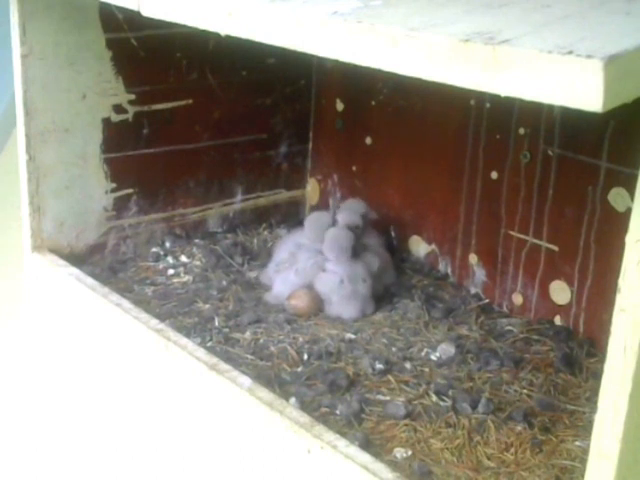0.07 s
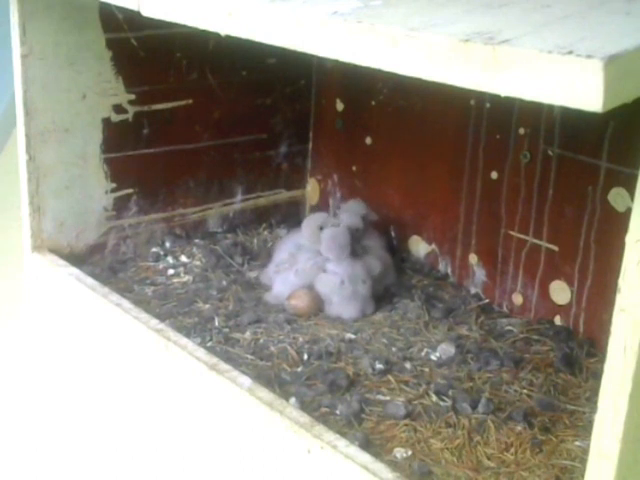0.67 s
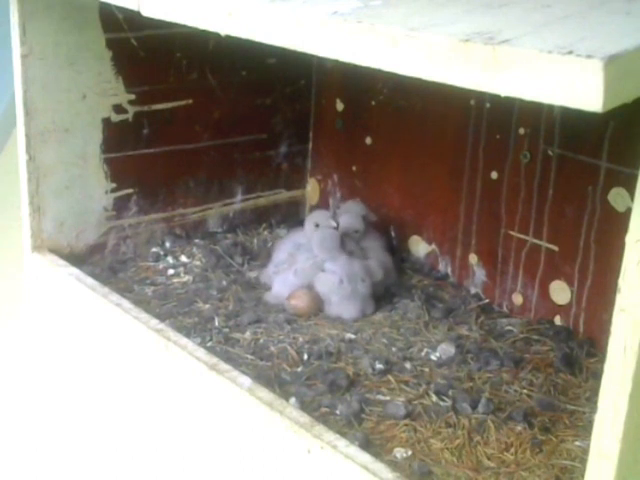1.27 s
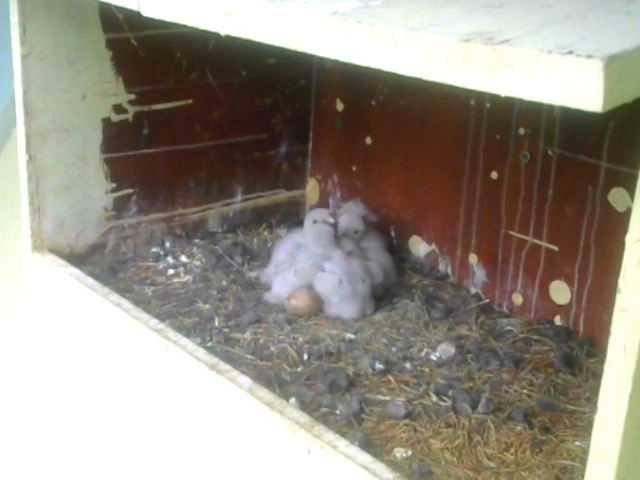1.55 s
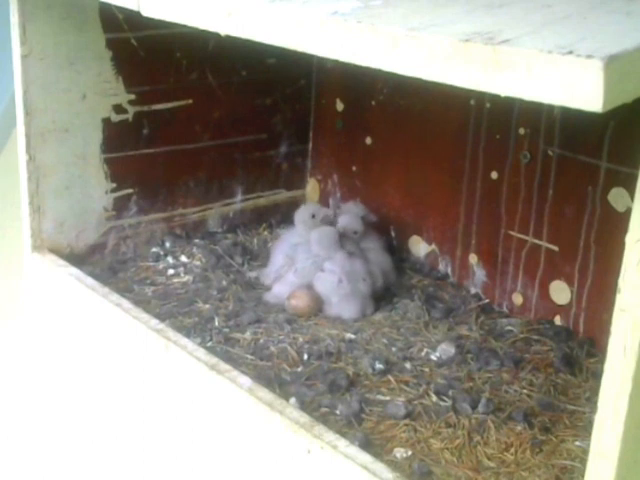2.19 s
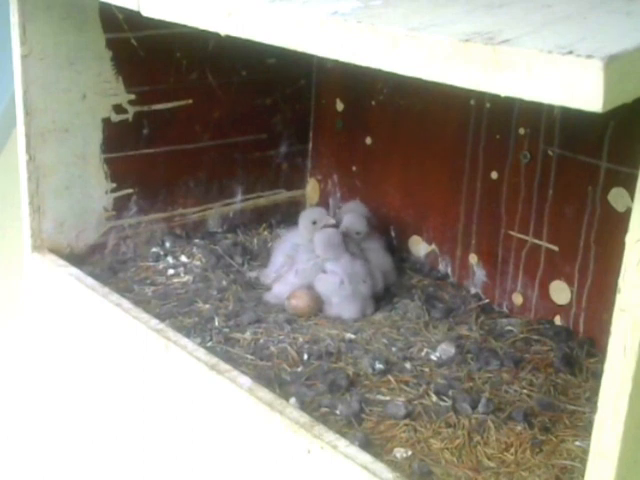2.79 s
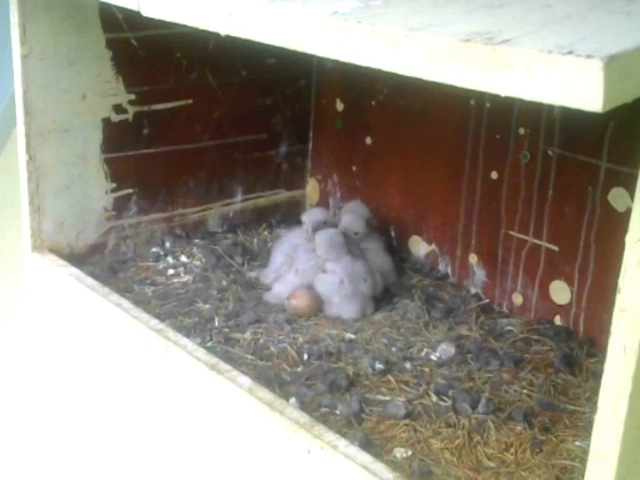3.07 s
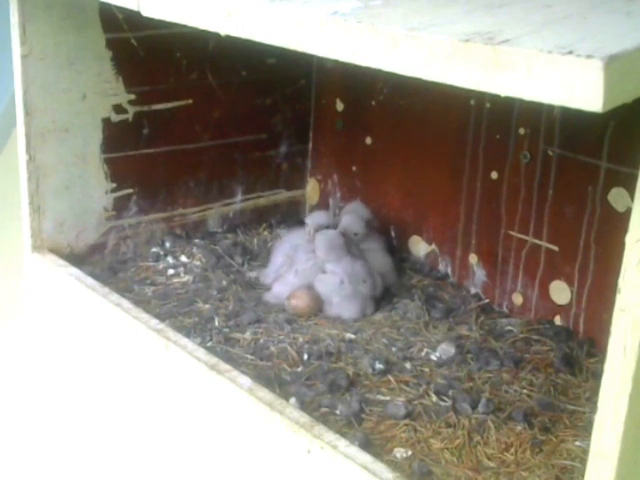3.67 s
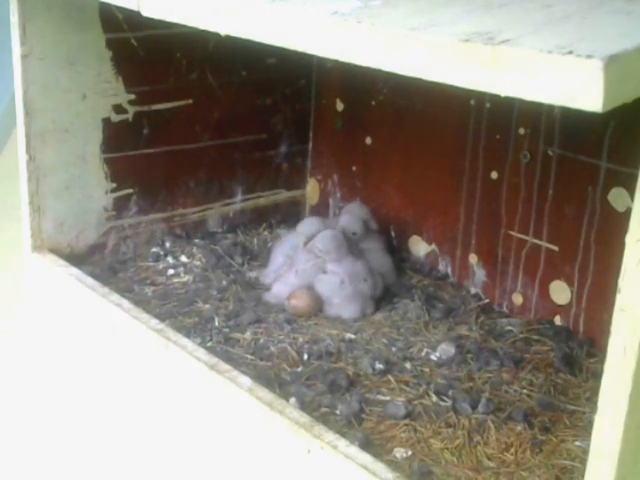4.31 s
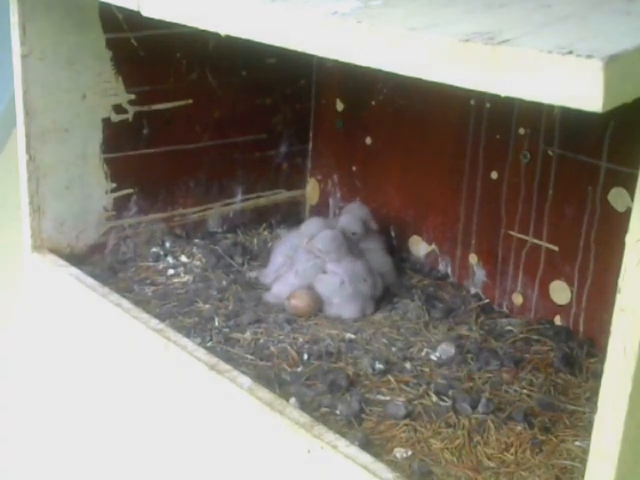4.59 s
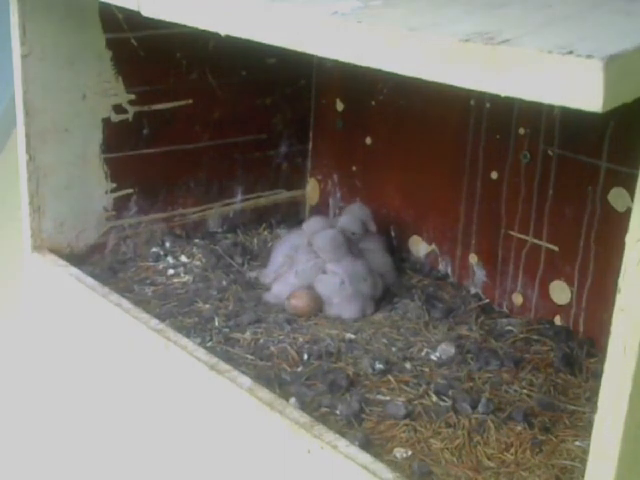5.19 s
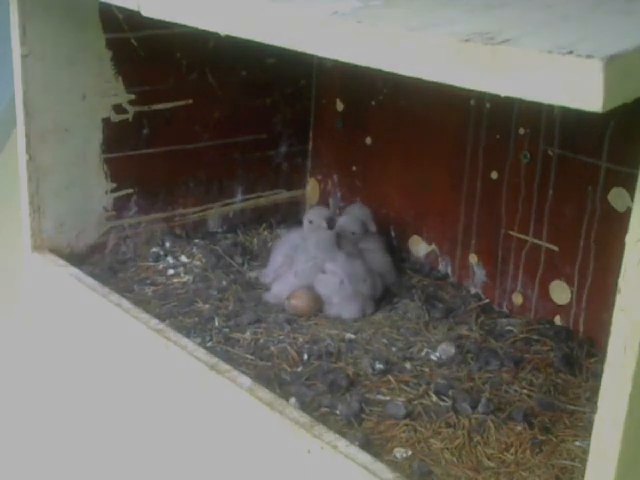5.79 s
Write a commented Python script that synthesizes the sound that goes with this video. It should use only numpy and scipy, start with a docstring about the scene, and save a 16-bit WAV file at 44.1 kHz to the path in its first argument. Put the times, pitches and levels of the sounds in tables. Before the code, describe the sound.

Nestlings in an open wooden box beg with thin, wavering two-note whistles, about two a second, and one call breaks into a brief squeal. Small birds outside add bursts of harsh, falling chirps with a slight echo, and others twitter faintly far away. The begging pauses midway, then resumes with a rustle of nest litter. Soft bumps and a steady microphone hiss lie underneath.

```python
"""Downy nestlings beg in an open wooden nest box with thin, wavering two-note whistles. From the start,
small birds outside answer with harsh falling chirps that echo, others twitter far away, and the chicks
shuffle now and then over a steady microphone hiss. Near 1.8 s one call breaks into a squeal. After 3.4 s
the begging pauses and a burst of chirps stands alone; at 4.5 s the litter rustles and the begging resumes.
A faint high peep comes near 4.8 s, then a last run of chirps as the hiss sinks a little."""
import sys
import numpy as np
from scipy import signal
from scipy.fft import rfft, irfft
from scipy.io import wavfile
from scipy.ndimage import uniform_filter1d

SR = 44100
rng = np.random.default_rng(int(sys.argv[2]) if len(sys.argv) > 2 else 0)


def transcribe(signal):
    """Save signal, clipped to [-1, 1], as a 16-bit WAV file at the path in sys.argv[1]."""
    frames = np.atleast_2d(signal).T
    limited = np.clip(frames, -1, 1)
    pcm = np.round(limited * 32767).astype(np.int16)
    wavfile.write(sys.argv[1], SR, pcm)


N = 257984
TIME = np.arange(N) / SR

# begging calls, two arches of pitch each: (start [s], first arch [s], second rise [s], final fall [s],
# opening pitch [Hz], first crest [Hz], dip [Hz], second crest [Hz],
# fundamental base level [dB], octave base level [dB], gain of second arch [dB])
BEGGING_CALLS = [(-0.039, 0.085, 0.024, 0.04, 3000, 3154, 3173, 3300, -36.5, -46.5, -2.5),
                 (0.454, 0.069, 0.05, 0.073, 3053.0, 3232, 3248, 3494, -38, -34, 0),
                 (0.968, 0.1, 0.061, 0.065, 3195, 3338, 3200, 3804, -37.5, -35.5, 0.0),
                 (1.557, 0.12, 0.066, 0.019, 3500, 3445, 3319.0, 3445, -37, -35, -3),
                 (2.139, 0.035, 0.013, 0.052, 3170, 3260, 3170, 3336, -48.5, -42.5, 5.5),
                 (2.589, 0.084, 0.082, 0.036, 3300, 3250, 3055.0, 3357, -41.5, -37, -1.0),
                 (3.142, 0.13, 0.044, 0.038, 3200, 3550, 3160, 3450, -46.0, -37.5, 3),
                 (4.556, 0.082, 0.056, 0.081, 3100, 3440, 3207, 3470, -46.5, -39, -1.5),
                 (5.197, 0.081, 0.021, 0.04, 3404, 3300, 3155.0, 3287, -46.5, -39.5, 0.5),
                 (5.712, 0.11, 0.013, 0.065, 3160, 3474, 3300, 3550, -51.5, -40.5, -5)]
# response of chick and box to the fundamental, and to the octave: (frequency [Hz], gain [dB])
FUNDAMENTAL_RESPONSE = [(2950, 0), (3230, 1), (3430, -1), (3530, -5.5), (3680, -1), (3860, -11)]
OCTAVE_RESPONSE = [(6000, -21), (6260, -6.5), (6460, 0.5), (6860, -2.5), (7080, -2), (7360, -6),
                   (7720, -31)]
# course of the squeal: (time [s], pitch [Hz], fundamental level [dB], octave level [dB])
SQUEAL_CONTOUR = [(1.744, 3610, -45, -66), (1.755, 4470, -32.5, -60), (1.764, 4895, -18, -73),
                  (1.773, 5230, -31, -76), (1.784, 4820, -20.5, -68), (1.794, 4000, -30, -33.5),
                  (1.805, 3450, -37, -37), (1.819, 3000, -38, -65)]
# chirps outside, one glide a row; the row at 3.823 s is an echo of the falling sweep just before it: # (start
# [s], duration [s], time to peak [s], first pitch [Hz], last pitch [Hz], relative level [dB], # rasp deviation
# [Hz])
CHIRP_SYLLABLES = [(0.018, 0.026, 0.0083, 5510, 6320, -31, 110),
                   (.034, 0.048, 0.034, 4560, 5190, -27.5, 190),
                   (0.068, .024, 0.0046, 3805, 2735, -29, 180), (0.107, .022, 0.016, 2810, 3570, -35.5, 40),
                   (0.124, .014, 0.0051, 3770, 4160, -26, 30), (0.843, 0.023, 0.022, 4410, 4080, -28, 120),
                   (0.853, 0.029, .008, 5120, 4490, -32, 200), (0.866, 0.039, 0.01, 3990, 2934, -18, 150),
                   (0.897, 0.057, .02, 2800, 3630, -35, 280), (0.937, 0.087, .024, 2260, 2560, -31, 170),
                   (3.799, 0.032, 0.031, 5280, 4150, -22, 140), (3.823, 0.048, 0.043, 5130, 3440, -24, 190),
                   (3.831, .04, .01, 3950, 2900, -18.5, 120), (3.869, .13, 0.025, 3686, 4256, -35.5, 260),
                   (3.91, 0.049, 0.015, 2504, 2474, -32.5, 150),
                   (5.06, 0.058, 0.025, 2830, 3090, -32.5, 90), (5.098, .04, 0.018, 2975, 2306, -35, 100),
                   (5.147, 0.14, 0.024, 2953, 2870, -37.5, 120), (5.226, 0.03, 0.027, 3824, 3670, -24, 60),
                   (5.468, 0.026, 0.026, 2446, 3020, -35, 70),
                   (5.491, 0.099, 0.0043, 3120, 3150, -32.5, 70.5),
                   (5.57, 0.065, .017, 5100, 4160, -30, 210), (5.573, 0.062, 0.04, 4305, 2810, -25, 190),
                   (5.631, 0.047, 0.013, 3100, 4330, -32.5, 200),
                   (5.662, 0.072, 0.025, 2873, 2240, -35, 150), (5.712, 0.13, 0.021, 2295, 1548, -37, 142)]
# far twitter: (start [s], duration [s], pitch [Hz], glide [Hz], level [dB], half-bandwidth [Hz])
FAR_NOTES = [(-.02, .06, 1566, 0, -50, 130), (0.088, 0.086, 1470, 3, -49.5, 45),
             (0.137, .42, 1670, -350, -57, 260), (0.833, 0.12, 1453, 0, -54, 70),
             (.98, 0.271, 1652, -100, -53.5, 300), (1.679, 0.18, 1823, 60, -52, 270),
             (1.858, 0.2, 1560, -100, -58, 70.4), (2.43, 0.15, 2316, -200, -58.5, 150),
             (2.886, 0.056, 2430, 0, -54, 140), (2.967, 0.085, 2420, 250, -48, 110),
             (3.048, 0.75, 2465, -100, -61.5, 150), (3.299, .2, 2054, 43, -53, 119)]
# chicks bumping the floor: (start [s], duration [s], frequency [Hz], level [dB])
FLOOR_BUMPS = [(.0, 0.18, 161.4, -54.5), (.975, 0.037, 149, -50), (1.055, 0.045, 541, -51.5),
               (1.2, 0.078, 291, -56), (1.382, 0.059, 290, -47), (1.759, 0.093, 169.5, -52),
               (1.875, 0.037, 174, -46.5), (2.392, 0.04, 194, -48.5), (3.675, 0.031, 403, -51.5),
               (3.84, 0.16, 260.6, -59), (4.049, 0.026, 265, -49), (4.899, 0.12, 254.6, -54.5)]
# rustles of the litter, and one faint high peep near 4.8 s:
# (start [s], duration [s], centre frequency [Hz], level [dB])
RUSTLES_AND_PEEP = [(0.607, 0.23, 7860, -57.5), (2.034, 0.2, 4020, -53), (3.044, 0.13, 4370, -53.5),
                    (4.507, 0.057, 7160, -46), (4.54, 0.11, 6260, -37.5), (4.814, 0.052, 6500, -50)]
# spectrum of the hiss: (frequency [Hz], relative spectral density [dB])
HISS_SPECTRUM = [(15, -65), (25, -22.5), (267, -2.5), (359, -11), (684, -2.5), (804, -8.5), (945, -7),
                 (1140, -13), (1410, -8.5), (1800, -13), (2490, -11), (3340, -12.5), (6730, -8),
                 (9550, -28), (15500, -33)]
# slow sinking of the background: (time [s], gain [dB])
BACKGROUND_GAIN = [(0, 1.53), (4.3, 0.5), (5.85, -2.5)]


def nestlings():
    """Turbulent flow through the beak adds hiss to each whistle; the box walls add early reflections."""
    calls = [whistle(*begging_contour(row), jitter=.006, shimmer_db=1.6, skirt_db=-7.5)
             for row in BEGGING_CALLS]
    tone, flow, gape = np.sum(calls, axis=0)
    # the air hisses higher as the beak opens
    dull_air = from_db(-19) * (1 - .5 * gape) * band_noise(5540, 6030)
    bright_air = from_db(-15) * gape * band_noise(7200, 8130)
    box = from_db(-14) * echoes(tone, delay_s=.002, t60=.05, count=60)
    return tone + flow * (dull_air + bright_air) + box


def begging_contour(row):
    """Source and filter: the pitch crests twice and sags, and chick and box weight each partial."""
    start, arch_s, rise_s, fall_s, *pitches, fundamental_db, octave_db, second_arch_db = row
    attack_s, release_s, sag_hz_per_s = .037, .033, 9500
    crest_s = arch_s + rise_s
    length = crest_s + fall_s
    at, t, gate = span(start, length)
    turns = np.arange(len(pitches))
    step = np.interp(t, [0, .6 * arch_s, arch_s, crest_s], turns)
    eased = np.floor(step) + np.sin(np.pi / 2 * (step % 1)) ** 2
    sag_hz = sag_hz_per_s * np.maximum(t - crest_s, 0) ** 2 / fall_s
    waver = wobble(28, len(at))   # unsteady effort moves pitch and level together
    hz = (np.interp(eased, turns, pitches) - sag_hz) * (1 + .005 * waver)
    edges = np.maximum(1 - t / attack_s, 0) ** 2 + np.maximum(1 - (length - t) / release_s, 0) ** 2
    accent_db = np.interp(t, [arch_s, arch_s + rise_s / 2], [0, second_arch_db])
    effort_db = accent_db - 18.5 * edges + .8 * waver
    thin_db = -2 * np.maximum(1 - t / .11, 0)   # the fundamental fills in after the octave
    fundamental_db += effort_db + thin_db + lookup(FUNDAMENTAL_RESPONSE, hz)
    octave_db += effort_db + lookup(OCTAVE_RESPONSE, 2 * hz)
    return at, gate, hz, fundamental_db, octave_db


def whistle(at, gate, hz, fundamental_db, octave_db, jitter, shimmer_db, skirt_db):
    """A nearly periodic source sounds three harmonics; returns the tone, air flow and beak gape."""
    tone, flow, gape = np.zeros((3, N))
    phase = phase_of(hz * (1 + jitter * wobble(290, len(at))))
    fundamental = gate * from_db(fundamental_db + shimmer_db * wobble(170, len(at)))
    octave = gate * from_db(octave_db + shimmer_db * wobble(170, len(at)))
    flow[at] = np.hypot(fundamental, octave)
    # the beak gapes on the high notes and lets the third harmonic out
    gape[at] = np.clip((hz - 3300) / 250, 0, 1)
    third = from_db(-46 + 10 * gape[at]) * np.sqrt(fundamental * octave)
    harmonics = fundamental * np.sin(phase) + octave * np.sin(2 * phase) + third * np.sin(3 * phase)
    # turbulence smears a skirt of noise round the lower two
    skirt = wobble(385, len(at)) * (fundamental * np.cos(phase) + octave * np.cos(2 * phase))
    tone[at] = np.sqrt(2) * harmonics + from_db(skirt_db) * skirt
    return tone, flow, gape


def squeal():
    """Strong jitter roughens a leaping whistle; the throat damps its top and the box reflects it."""
    times, *columns = np.transpose(SQUEAL_CONTOUR)
    at, _, gate = span(times.min(), np.ptp(times))
    rounding = len(at) // (3 * len(times))   # muscle rounds the corners of the contour
    curves = [uniform_filter1d(np.interp(at / SR, times, column), rounding, mode="nearest")
              for column in columns]
    tone, _, _ = whistle(at, gate, *curves, jitter=.014, shimmer_db=3, skirt_db=-7)
    tone = filtered(tone, 9500, "low", order=4)
    return tone + from_db(-10.5) * echoes(tone, delay_s=.0042, t60=.09, count=80)


def chirp(row):
    """Random frequency and amplitude modulation make an exponential sweep rasp as it swells and fades."""
    start, length, peak_s, first_hz, last_hz, level_db, rasp_hz = row
    at, t, gate = span(start, length)
    rise = np.interp(t, [0, peak_s], [1, 0])
    fall = np.clip((t - peak_s) / max(length - peak_s, 1 / SR), 0, 1)
    swell_db = -13 * rise ** 1.12 - 16 * fall ** 1.12
    hz = first_hz * (last_hz / first_hz) ** (t / length)
    phase = phase_of(hz + rasp_hz * wobble(620, len(at)))
    flutter = unit_rms(from_db(1.65 * wobble(173, len(at))))
    voice = np.zeros(N)
    voice[at] = np.sqrt(2) * gate * flutter * from_db(level_db + swell_db) * np.sin(phase)
    return voice


def birds_outside():
    """Multipath propagation: chirps arrive directly, then as near reflections, an echo and a tail."""
    voice = sum(chirp(row) for row in CHIRP_SYLLABLES)
    near = from_db(-2.5) * echoes(voice, delay_s=.0005, t60=.075, count=60)
    bright = filtered(voice, 3500, "high")   # distant surfaces return mostly the high part of each sweep
    late = from_db(-16) * echoes(bright, delay_s=.024, t60=.13, count=120)
    return from_db(-9) * voice + near + late + from_db(-17) * reverberation(bright, t60=.77)


def far_birds():
    """Propagation over a distance weakens notes and blurs them into narrow bands of noise."""
    return sum(noise_swell(start, length, hz, db, half_band_hz, glide_hz)
               for start, length, hz, glide_hz, db, half_band_hz in FAR_NOTES)


def shuffling_and_peep():
    """Impact and friction: chicks bump and scuff the floor and rustle the litter; one faint peep sounds."""
    bumps = sum(noise_swell(*row, half_band_hz=27.4) for row in FLOOR_BUMPS)
    bumps = filtered(bumps, 75, "high")   # the small floor carries no deep bass
    scuffs = from_db(-70.5) * band_noise(210, 560) * from_db(6.5 * np.minimum(wobble(12, N), 2))
    rustles_and_peep = sum(noise_swell(*row, half_band_hz=430) for row in RUSTLES_AND_PEEP)
    return bumps + scuffs + rustles_and_peep


def background():
    """The noise floor: broadband microphone hiss over a low, gently wavering outdoor rumble."""
    hz, level_db = np.transpose(HISS_SPECTRUM)
    bin_hz = np.maximum(np.arange(N // 2 + 1) * SR / N, 1)
    colour = from_db(np.interp(np.log(bin_hz), np.log(hz), level_db))
    hiss = from_db(-53) * unit_rms(irfft(rfft(rng.standard_normal(N)) * colour, N))
    rumble = from_db(-66) * band_noise(108, 297) * from_db(2.5 * wobble(9.2, N))
    return (hiss + rumble) * from_db(lookup(BACKGROUND_GAIN, TIME))


def echoes(x, delay_s, t60, count):
    """Convolution with a unit-energy cloud of reflections that decays by 60 dB in t60 seconds."""
    lags = rng.uniform(0, .7 * t60, count)
    response = np.zeros(int((delay_s + t60) * SR) + 2)
    response[((delay_s + lags) * SR).astype(int)] = rng.choice([-1, 1], count) * from_db(-60 * lags / t60)
    return signal.fftconvolve(x, response / np.linalg.norm(response))[:N]


def reverberation(x, t60):
    """A diffuse field: a band of noise stores the sound's energy and loses it exponentially."""
    retained = from_db(-120 / (t60 * SR))
    energy = signal.lfilter([1 - retained], [1, -retained], x ** 2 + 1e-18)
    return np.sqrt(energy) * band_noise(2930, 4400)


def noise_swell(start, length, hz, level_db, half_band_hz, glide_hz=0):
    """Random quadrature modulation spreads a tone into a narrow band, which swells and fades."""
    at, _, _ = span(start, length)
    phase = phase_of(hz + glide_hz * np.linspace(-.5, .5, len(at)))
    noise = wobble(half_band_hz, len(at)) * np.cos(phase) + wobble(half_band_hz, len(at)) * np.sin(phase)
    swell = np.zeros(N)
    swell[at] = from_db(level_db) * signal.windows.tukey(len(at), .7) * noise
    return swell


def span(start, length):
    """Time windowing: an event's sample indices, elapsed time and a gate with soft edges."""
    at = np.arange(max(int(start * SR), 0), min(int((start + length) * SR), N))
    return at, at / SR - start, signal.windows.tukey(len(at), min(1, .00099 * SR / len(at)))


def band_noise(low_hz, high_hz):
    """Band-limited noise of unit rms."""
    return unit_rms(filtered(rng.standard_normal(N), [low_hz, high_hz], "band"))


def wobble(rate_hz, size):
    """Low-pass noise of unit rms: a random modulator."""
    return unit_rms(filtered(rng.standard_normal(size + SR // 10), rate_hz, "low")[-size:])


def filtered(x, edges_hz, kind, order=2):
    """A filter with a maximally flat passband."""
    return signal.sosfilt(signal.butter(order, edges_hz, kind, fs=SR, output="sos"), x)


def phase_of(hz):
    """Phase is the time integral of angular frequency."""
    return 2 * np.pi * np.cumsum(hz) / SR


def lookup(table, x):
    """Linear interpolation in a two-column table."""
    return np.interp(x, *np.transpose(table))


def from_db(db):
    """Amplitude grows tenfold for every 20 dB."""
    return 10 ** (np.asarray(db) / 20)


def unit_rms(x):
    """Normalisation to unit mean power."""
    return x / np.sqrt(np.mean(x ** 2) + 1e-20)


def scene():
    """Superposition: all sources add at one microphone, heard alike on both channels."""
    mono = nestlings() + squeal() + birds_outside() + far_birds() + shuffling_and_peep() + background()
    return np.array([mono, mono])


def record(dry):
    """Band limiting: a steep low-pass filter removes the treble above 15.7 kHz."""
    return signal.sosfilt(signal.ellip(12, .1, 80, 15700, fs=SR, output="sos"), dry)


dry = scene()
out = record(dry)
transcribe(out)
```